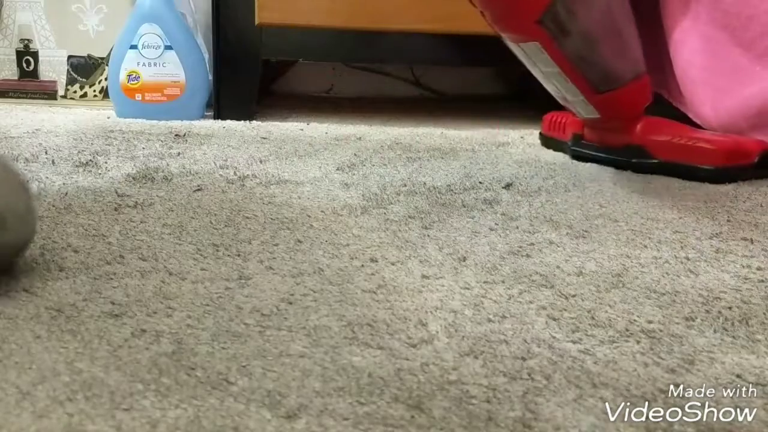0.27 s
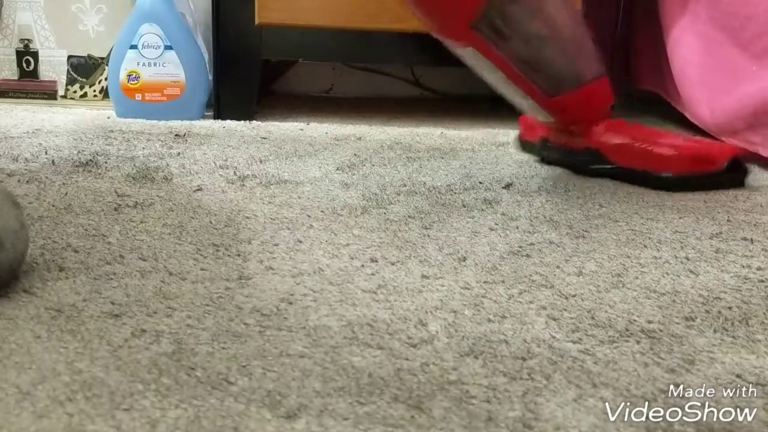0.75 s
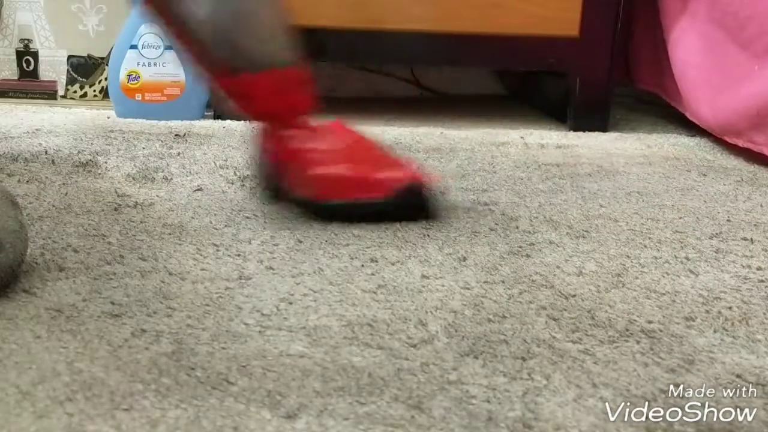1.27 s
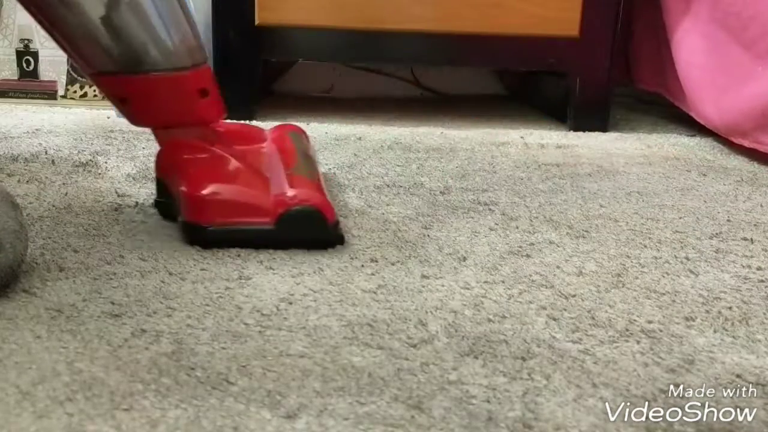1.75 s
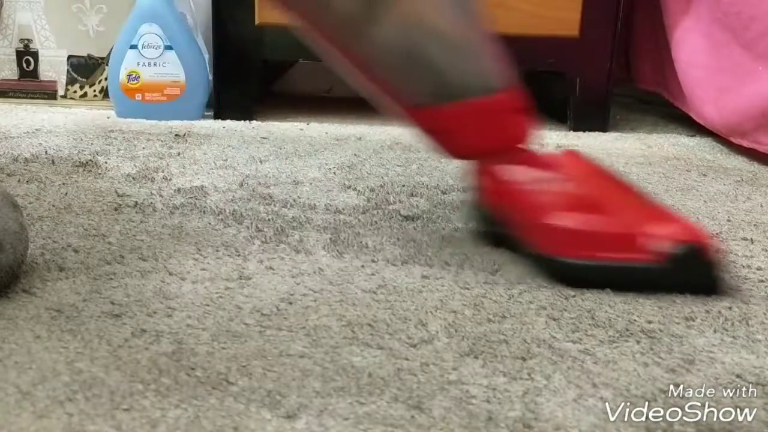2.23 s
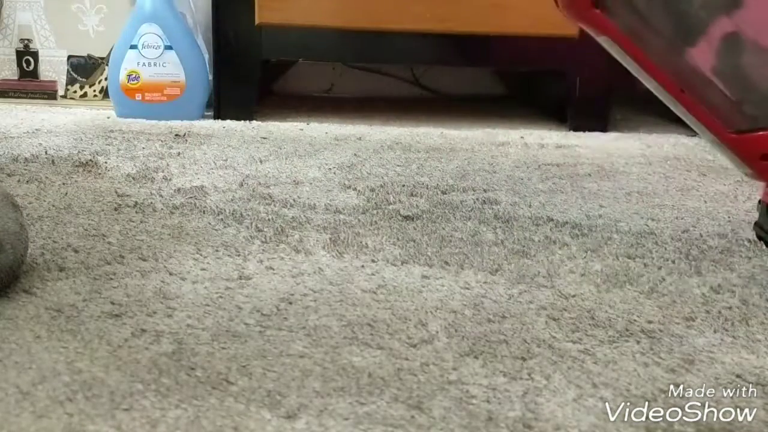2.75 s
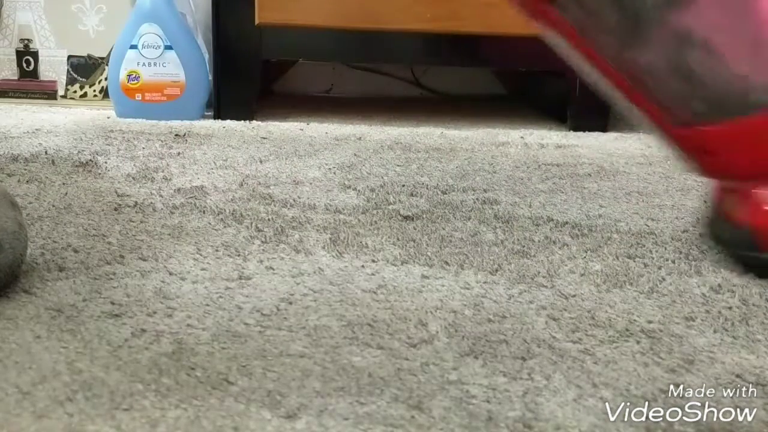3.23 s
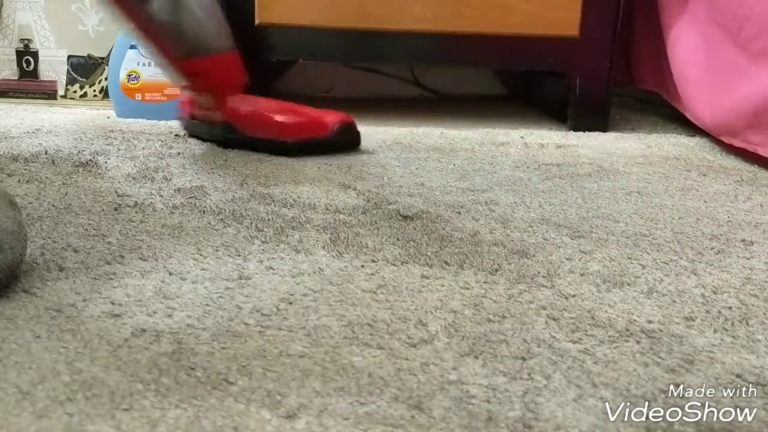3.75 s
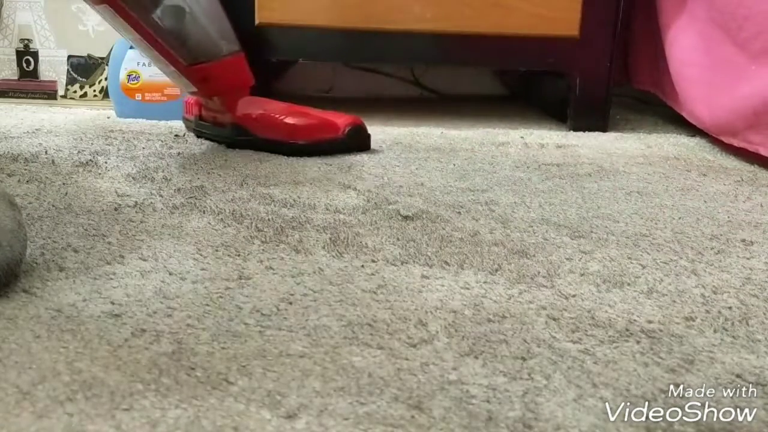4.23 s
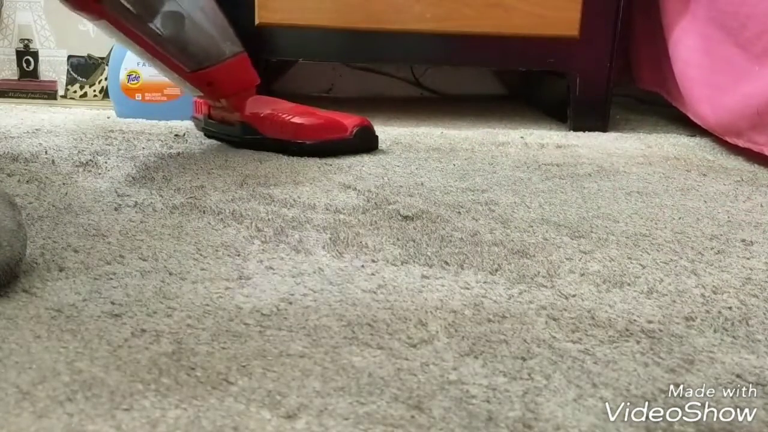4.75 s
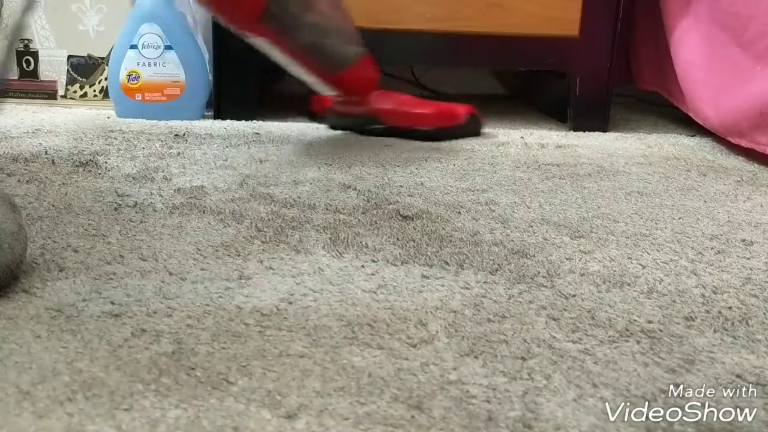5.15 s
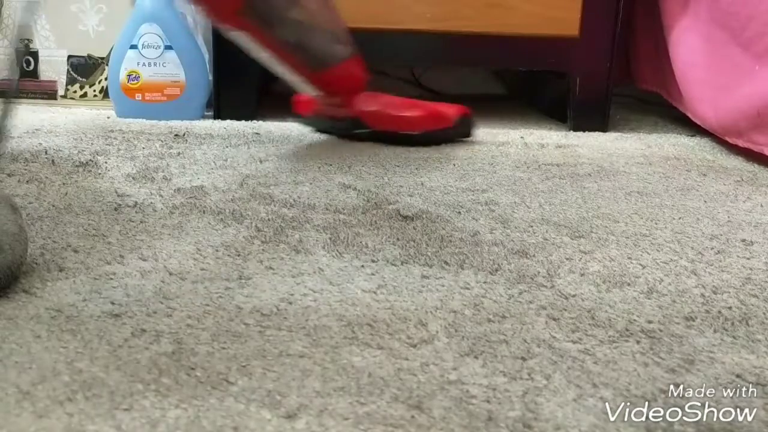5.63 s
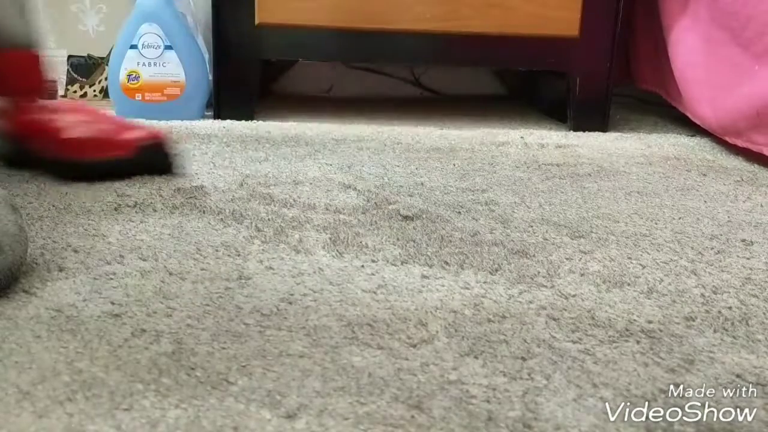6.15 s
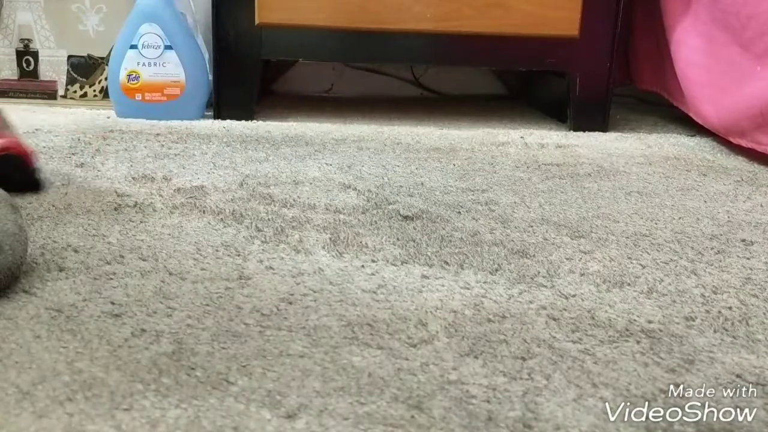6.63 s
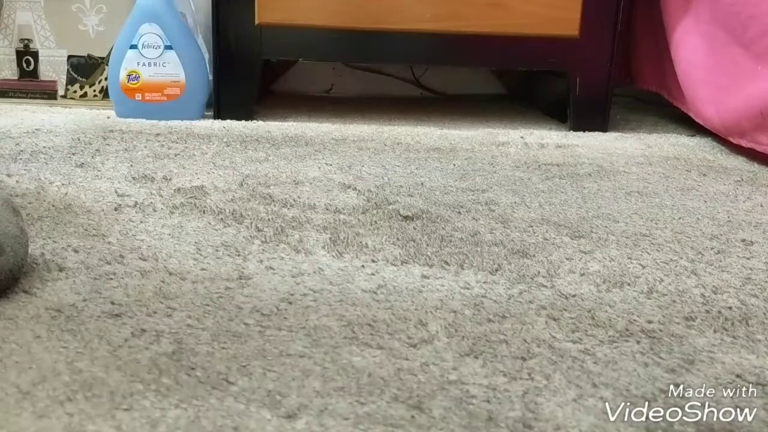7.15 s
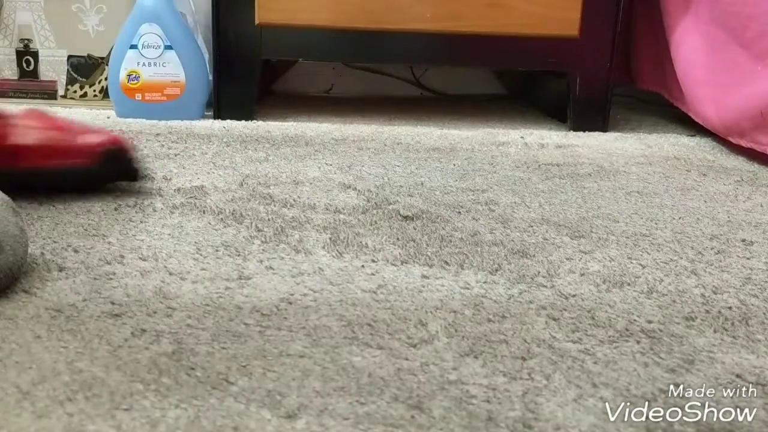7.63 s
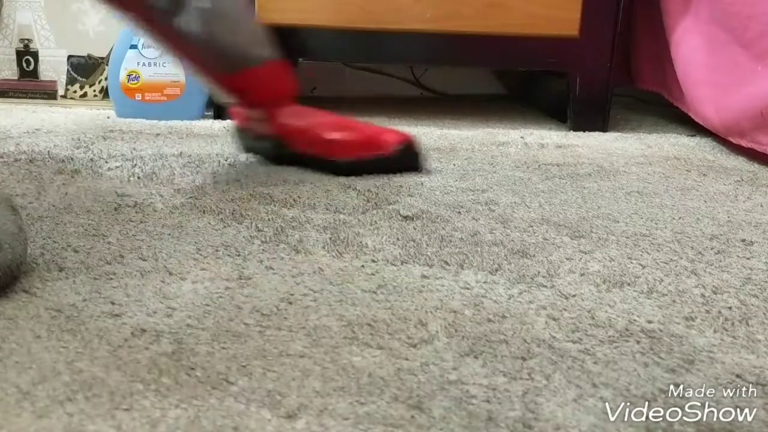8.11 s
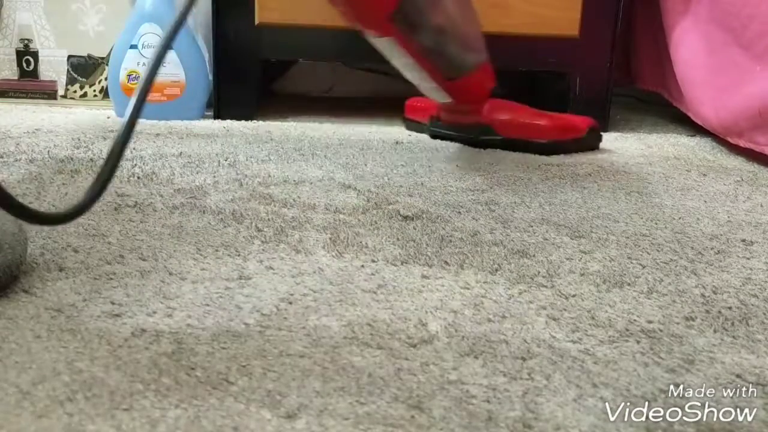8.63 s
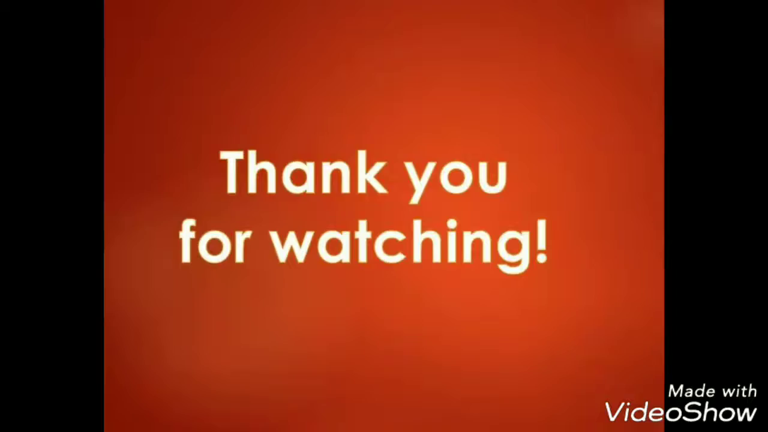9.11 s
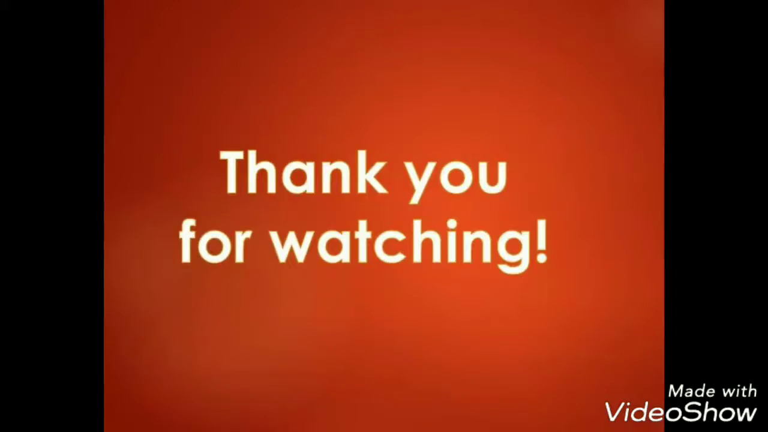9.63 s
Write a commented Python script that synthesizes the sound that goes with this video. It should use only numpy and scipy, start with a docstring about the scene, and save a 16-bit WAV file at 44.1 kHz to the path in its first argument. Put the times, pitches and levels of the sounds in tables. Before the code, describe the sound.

Continuous vacuum noise from the first instant: midrange hum, piercing but thin whistle and hissing, fizzy exhaust air at constant motor speed. The hum swells as the head passes near the floor-level microphone, and faint carpet rumble comes with pushes and pulls. One solid plastic-and-wood thud briefly ducks the noise; a weaker, duller tap follows over a second later. The close, nearly mono indoor sound ends in abrupt silence.

```python
"""Stick vacuum on carpet

A corded stick vacuum is pushed to and fro near a small microphone on the floor, until a sudden cut to silence.
Motor: sines on multiples of the shaft speed. Air through nozzle and exhaust: shaped noise in five bands.
Rolling: low noise that swells with each stroke. Two furniture bumps: noise rattle, decaying modes, room boom."""
import sys
import numpy as np
from scipy import signal
from scipy.fft import rfft, irfft, next_fast_len
from scipy.io import wavfile
from scipy.ndimage import uniform_filter1d, map_coordinates

SR = 44100
rng = np.random.default_rng(int(sys.argv[2]) if len(sys.argv) > 2 else 0)


def output_pcm(signal):
    """Save a mono or channel-first signal as 16-bit PCM at the path in sys.argv[1].

    Samples are clipped to [-1, 1] before scaling.
    """
    pcm = np.clip(np.atleast_2d(signal).T, -1, 1) * 32767
    wavfile.write(sys.argv[1], SR, np.round(pcm).astype(np.int16))


N = 435266
T = np.arange(N) / SR
MAINS_HZ = 60


def amp(db):
    """Amplitude ratio of a level in dB."""
    return 10 ** (np.asarray(db) / 20)


def unit(x):
    """Scales x to rms 1."""
    return x / np.sqrt(np.mean(x ** 2) + 1e-20)


def along(points, hz):
    """Interpolates (Hz, value) points on a log axis."""
    f, v = np.transpose(points)
    return np.interp(np.log(hz + 1), np.log(f + 1), v)


def curves(rows):
    """One value per sample for each column after the time."""
    s, *cols = np.transpose(rows)
    return [np.interp(T, s, c) for c in cols]


def wobble(knots_per_s):
    """A smooth random curve through normally distributed knots."""
    knots = rng.standard_normal(int(N * 60 / SR))
    return map_coordinates(knots, [T * knots_per_s])


def bell(middle_s, length_s, edge):
    """Rises and falls around a moment; the larger edge, the flatter the top."""
    return np.exp(-np.abs(2 * (T - middle_s) / length_s) ** edge)


def filtered(x, response):
    """x times a response of frequency, zero phase."""
    m = next_fast_len(N + SR // 2)
    return irfft(rfft(x, m) * response(np.fft.rfftfreq(m, 1 / SR)), m)[..., :N]


# left-right correlation of the noises: f/Hz, likeness
LIKENESS = [(25, .965), (70, .96), (150, .97), (300, .97), (1200, .95), (2500, .97), (5000, .94),
            (12000, .91)]


def rush(gain, patchy_db):
    """Nearly mono turbulence noise of rms 1, with time-frequency patches of random gain."""
    z = signal.stft(rng.standard_normal((2, N)), nperseg=512)[2]
    field = uniform_filter1d(rng.standard_normal(z.shape[1:]), size=3, axis=0)
    field = uniform_filter1d(field, size=18, axis=1)
    pair = signal.istft(z * amp(patchy_db * unit(field)), nperseg=512)[1][:, :N]

    def mid_side_gain(hz):
        turn = np.arccos(np.clip(along(LIKENESS, hz), -1, 1)) / 2
        return gain(hz) * [np.cos(turn), np.sin(turn)]

    mid, side = filtered(pair, mid_side_gain)
    return unit(np.array([mid + side, mid - side]))


# exhaust turning towards and away from the microphone:
# t/s, fizz level/dB, casing whoosh re fizz/dB, hiss re fizz/dB
EXHAUST = [(0, -48.5, 5.5, 0), (.35, -49, 1.5, 0), (.72, -49, 0.5, 2.5), (1.2, -47, 2, -1),
           (1.4, -48.5, 1.5, -2.5), (1.6, -51.5, 1, 0), (1.8, -52.5, 2.5, 2.5), (2.1, -52, 4, 1),
           (2.3, -49, 2.5, 0), (2.6, -47.5, 3.5, -1), (3.1, -47, 0.5, -2.5), (3.37, -47.5, 4, -0.5),
           (3.57, -45.5, 0.5, -3.5), (3.72, -46, 1.5, -2), (4.1, -49, 1.5, 3), (4.45, -46.5, 3, 0),
           (4.72, -48.5, 2, 1), (5.0, -46.5, 2.5, -1), (5.25, -47, -3.5, 2), (5.5, -48.5, -3, 0.5),
           (5.7, -48.5, -1.5, 2), (5.85, -47.5, -2, -0.5), (6.05, -50.5, 2.5, 1.5), (6.3, -49.5, 1, -1),
           (6.56, -54, 4.5, 1.5), (6.82, -55, 5, 3.5), (7.3, -54, 4.5, 0.5), (7.72, -52.5, 3.5, -1),
           (7.97, -51, -0.5, 1.5), (8.1, -48.5, 2.5, 0), (8.5, -45, -0.5, -0.5), (8.96, -43.5, -3.5, -1)]
USUAL_FIZZ_DB = -49.5
JET_DB, JET_DB_PER_SWING_DB = -53, .8
JET_DB_PER_CASING_DB, JET_DB_PER_HISS_DB = 0.52, -0.22


def air_levels():
    """Fizz, casing whoosh, hiss and jet levels in dB all follow the turning exhaust."""
    fizz_db, casing_re_db, hiss_re_db = curves(EXHAUST)
    swing_db = fizz_db - USUAL_FIZZ_DB
    jet_db = JET_DB + JET_DB_PER_SWING_DB * swing_db
    jet_db = jet_db + JET_DB_PER_CASING_DB * casing_re_db + JET_DB_PER_HISS_DB * hiss_re_db
    return fizz_db, fizz_db + casing_re_db, fizz_db + hiss_re_db, jet_db


# shaft speed: t/s, f/Hz
SHAFT_SPEED = [(0.0, 315.64), (1.4, 315.57), (2.05, 316.08), (2.35, 315.84), (2.6, 315.85), (3.25, 316.31),
               (3.65, 315.58), (4.45, 317.1), (4.7, 317.32), (5.25, 316.86), (5.9, 316.93), (6.6, 316.55),
               (6.9, 316.66), (7.5, 317.35), (8.2, 316.3), (8.85, 316.35)]
# shaft hum, loudest when the machine is near: t/s, level/dB
SHAFT_HUM = [(0.0, -46), (0.06, -56.5), (0.14, -46), (0.26, -55.5), (0.34, -46), (0.5, -51), (0.58, -43),
             (0.66, -53), (0.72, -45), (1.06, -45.5), (1.74, -35.5), (1.9, -38), (2.06, -33.5),
             (2.24, -37.5), (3.14, -44), (3.26, -39), (3.4, -39), (3.74, -44), (3.9, -42.5), (4.08, -49),
             (4.2, -47.5), (4.3, -52), (4.94, -48), (5.06, -42.5), (5.2, -52), (5.355, -43.5), (5.38, -39),
             (5.52, -40.5), (5.84, -47.5), (6.14, -45.5), (6.44, -37), (7.28, -39), (7.38, -36.5),
             (7.66, -36), (7.82, -42), (8.02, -39.5), (8.2, -46.5), (8.4, -46.5), (8.62, -42.5),
             (8.72, -45.5), (8.88, -55), (8.92, -46)]
# low overtones, swelling and fading as the machine moves through the room: t/s, level/dB
ORDER_2 = [(0.0, -53), (0.12, -58), (0.32, -47), (1.06, -56.5), (1.22, -62), (1.76, -54.5), (1.92, -66),
           (2.1, -47.5), (2.3, -59), (2.48, -45), (2.68, -50), (3.1, -52.5), (3.28, -48.5), (3.52, -56.5),
           (3.82, -48.5), (3.94, -54), (4.3, -50.5), (4.56, -56.5), (4.77, -56), (4.83, -43), (4.95, -39.5),
           (5.06, -45), (5.085, -65), (5.14, -57), (5.26, -50.5), (5.72, -52.5), (5.92, -46.5),
           (6.1, -61.0), (6.44, -49), (6.92, -47.5), (7.2, -62.5), (7.66, -48.5), (7.8, -57.5),
           (7.96, -43.5), (8.22, -65), (8.34, -52), (8.46, -57), (8.66, -46.5), (8.92, -48)]
ORDER_3 = [(0.0, -51.5), (0.14, -59), (0.38, -65), (0.64, -54.5), (0.82, -64.5), (1.14, -56.5),
           (1.32, -71.5), (1.56, -53.5), (2.02, -63.5), (2.98, -52.5), (3.6, -51.5), (3.9, -72.5),
           (4.14, -72), (4.26, -60.5), (4.42, -69), (4.88, -67), (5.48, -48), (5.72, -67), (5.88, -57),
           (6.36, -59.5), (6.78, -65.5), (7.26, -54), (7.96, -56.5), (8.22, -64), (8.4, -57.5), (8.92, -54)]
ORDER_4 = [(0.0, -60.5), (0.2, -55.5), (0.3, -62), (1.96, -55.5), (2.84, -65.5), (3.2, -63), (3.48, -67),
           (3.86, -58), (3.96, -58.5), (4.04, -71.5), (4.18, -67.5), (4.5, -57.5), (4.94, -55), (5.2, -60),
           (5.82, -54), (5.96, -58), (6.08, -79), (6.32, -61), (7.0, -72), (7.8, -55.5), (8.2, -71.5),
           (8.92, -59.5)]
ORDER_5 = [(0.0, -66.5), (0.16, -67), (0.32, -52.5), (0.44, -76), (0.66, -61.5), (0.96, -63), (1.12, -69),
           (2.26, -51.5), (2.8, -60.5), (3.7, -58.5), (3.94, -72.5), (4.14, -67.5), (4.32, -60.5),
           (5.18, -71.5), (5.44, -60), (5.76, -65), (6.76, -59), (7.7, -61.5), (8.12, -55.5), (8.32, -70.5),
           (8.5, -61), (8.92, -61.5)]
# fan blade whistle, order 10: t/s, level/dB
BLADE_WHISTLE = [(0.0, -43.0), (0.1, -45), (0.36, -41), (0.72, -45.5), (0.96, -40), (1.26, -43.5),
                 (1.52, -50), (1.6, -61.0), (1.74, -59), (1.88, -53.5), (2.28, -44), (2.46, -45),
                 (2.76, -40), (3.2, -47), (3.38, -40.5), (3.52, -58.5), (3.64, -45.5), (3.86, -46),
                 (3.94, -44), (4.1, -41), (4.52, -43), (4.64, -44), (4.92, -44.5), (5.14, -48.5),
                 (5.52, -41.5), (5.9, -47), (6.02, -61), (6.12, -45), (6.22, -45), (6.48, -60), (6.6, -57),
                 (6.68, -55), (6.98, -45.5), (7.2, -50), (7.3, -47), (7.44, -53.5), (7.68, -46.5),
                 (7.92, -58.5), (8.24, -43.0), (8.36, -42.5), (8.48, -57.5), (8.62, -43.5), (8.72, -49.5),
                 (8.8, -44.5), (8.92, -45.5)]
# orders beside the whistle, fading in and out likewise: t/s, level/dB
ORDER_8 = [(0.0, -63.5), (0.62, -73), (1.44, -48.5), (1.68, -62), (1.88, -56), (2.2, -68.5), (2.6, -51.5),
           (2.92, -59), (3.16, -46.5), (3.64, -67), (3.82, -48), (4.2, -69.5), (4.72, -51), (4.9, -64),
           (5.16, -59), (5.58, -69), (5.9, -72.5), (6.06, -53), (6.54, -64.5), (6.76, -52), (6.9, -69),
           (7.1, -56.5), (7.84, -67.5), (8.14, -51.5), (8.64, -59.5), (8.92, -56)]
ORDER_9 = [(0.0, -52.5), (0.38, -51.5), (0.8, -60), (1.04, -54), (1.48, -68), (1.98, -54.5), (2.5, -59),
           (3.18, -46.5), (3.42, -60.5), (3.58, -48.5), (3.7, -55), (3.96, -65), (4.34, -49.5), (4.94, -55),
           (5.2, -49.5), (5.46, -63.5), (5.62, -56.5), (6.14, -54.5), (6.82, -61.5), (7.24, -61.5),
           (7.7, -53), (8.02, -54.5), (8.3, -61.5), (8.54, -49), (8.74, -59.5), (8.92, -48)]
ORDER_11 = [(0.0, -57.5), (0.32, -72), (0.62, -57.5), (1.0, -62.5), (1.18, -50), (1.34, -65), (1.52, -62),
            (1.76, -56.5), (2.98, -55), (3.18, -60), (3.4, -61), (3.78, -69.5), (4.18, -51.5), (4.5, -58),
            (4.74, -59.5), (5.02, -58.5), (5.5, -49.5), (5.68, -61), (6.04, -54), (6.54, -65.0),
            (6.82, -58.5), (7.9, -68.5), (8.1, -52.5), (8.42, -52), (8.58, -61.5), (8.92, -59)]
ORDER_12 = [(0.0, -68), (0.22, -59.5), (0.84, -63.5), (1.24, -64.5), (2.02, -54.5), (2.18, -64.5),
            (2.48, -52.5), (2.8, -69), (3.06, -70.5), (3.32, -65), (3.54, -66.5), (3.82, -50.5),
            (4.16, -70.5), (4.94, -60.5), (5.2, -71), (5.4, -59.5), (5.96, -65), (6.24, -70.5),
            (6.4, -60.5), (6.7, -54), (7.08, -67), (7.88, -64.5), (8.12, -49), (8.46, -63.5), (8.66, -50),
            (8.92, -64.5)]
ORDER_LEVELS = {1: SHAFT_HUM, 2: ORDER_2, 3: ORDER_3, 4: ORDER_4, 5: ORDER_5, 8: ORDER_8,
                9: ORDER_9, 10: BLADE_WHISTLE, 11: ORDER_11, 12: ORDER_12}
# weaker orders, fading by chance as the machine moves: multiple of shaft speed, level between fades/dB
WEAK_ORDERS = [(7, -62)]
FADE_DB, FADE_KNOTS_PER_S = 9.5, 5.6
WEAK_DB_PER_SWING_DB = 0.044  # per multiple
# faint orders that leave with the exhaust air: multiple of shaft speed, level re hiss/dB
FAINT_ORDERS = [(6, -17), (13, -13), (14, -16), (15, -17), (16, -21), (17, -19), (18, -17), (19, -17),
                (20, -18), (21, -23), (22, -22), (23, -23), (27, -22), (28, -20), (30, -29), (31, -29),
                (40, -38)]
# one order swelling out of the noise: t of middle/s, length/s, multiple of shaft speed, level/dB
ORDER_SWELLS = [(.75, 0.24, 14, -54.5), (2.186, 0.44, 5, -52), (3.05, 1, 7, -58), (4.65, 1.3, 40, -73),
                (4.72, .22, 13, -52.5), (6.4, 0.51, 7, -59), (6.85, 0.42, 5, -54.5), (8.258, 0.23, 7, -55),
                (8.649, 0.37, 13, -54)]
SWELL_EDGE = 22
# torque ripple at twice the mains, beside some orders:
# multiple of shaft speed, ripples above (+) or below (-), level re fizz between fades/dB
RIPPLE_TONES = [(10, -1, -10), (10, 1, -8), (7, 1, -16)]


def order_sizes(fizz_db, hiss_db):
    """Rms of each shaft order before flutter."""
    sizes = {order: amp(curves(rows)[0]) for order, rows in ORDER_LEVELS.items()}
    for order, db in WEAK_ORDERS:
        follow_db = WEAK_DB_PER_SWING_DB * order * (fizz_db - USUAL_FIZZ_DB)
        sizes[order] = amp(db + follow_db - FADE_DB * wobble(FADE_KNOTS_PER_S) ** 2)
    for order, db in FAINT_ORDERS:
        sizes[order] = amp(hiss_db + db + 3 * wobble(6))
    for middle_s, length_s, order, db in ORDER_SWELLS:
        swell = amp(db) * bell(middle_s, length_s, SWELL_EDGE)
        sizes[order] = np.maximum(sizes[order], swell)
    return sizes


def motor():
    """Sines locked to multiples of one unsteady shaft angle; torque ripple adds side tones."""
    shaft_hz = curves(SHAFT_SPEED)[0] + .25 * wobble(25) + 0.05 * wobble(4)
    angle = 2 * np.pi * np.cumsum(shaft_hz) / SR
    fizz_db, _, hiss_db, _ = air_levels()
    out = np.zeros((2, N))
    for order, size in order_sizes(fizz_db, hiss_db).items():
        steadiness = .4 if order in (1, 10) else 1
        flutter_db = steadiness * (wobble(12) + 1.5 * wobble(30))
        if order > 30:
            flutter_db = flutter_db + 2.5 * wobble(20)
        # room paths smear the phase and turn it a little between the two ports
        smear = 0.085 * wobble(9) + 0.12 * np.sqrt(order) * wobble(2.5)
        phase = order * angle + 2 * np.pi * rng.random() + smear
        skew = 0.03 * np.sqrt(order) * wobble(24)
        out += np.sqrt(2) * size * amp(flutter_db) * np.sin([phase + skew, phase - skew])
    for order, ripples, db in RIPPLE_TONES:
        phase = order * angle + ripples * 2 * np.pi * 2 * MAINS_HZ * T + wobble(6.7)
        level_db = fizz_db + db - 6.9 * wobble(2.1) ** 2 + wobble(12)
        out += np.sqrt(2) * amp(level_db) * np.sin(phase)
    return out


# roar, changing with the nozzle's place on the carpet: t/s, level/dB, upper part re level/dB
NOZZLE_ROAR = [(0, -48.5, 2.5), (.5, -47, -1.5), (1, -49, 1.5), (1.5, -48, -1), (2, -47.5, -2.5),
               (2.5, -49, 4.5), (3, -46.5, -5.5), (3.5, -49, 4), (4, -48, 0.5), (4.5, -46.5, -1.5),
               (5, -46, -2), (5.2, -49, 1), (5.5, -51, 5.5), (6, -46, -2.5), (6.5, -47, -1.5), (7, -48, -1),
               (7.5, -47, -2.5), (7.9, -45.5, -4.5), (8.15, -47, -4), (8.4, -47.5, 3), (8.96, -46.5, 2)]
ROAR_SPLIT_HZ = 920
# relative spectral density of each flow noise: f/Hz, level/dB per Hz
ROAR_SPECTRUM = [(60, -38), (100, -7), (160, 0.5), (300, 1), (450, 0), (700, 0), (1000, -5), (1600, -5.5),
                 (2100, -8.5), (3000, -47.5)]
HISS_SPECTRUM = [(3000, -13.5), (3700, -2.5), (4400, 0.5), (4900, -2.5), (5400, -6), (6000, -52)]
JET_SPECTRUM = [(4300, -46.5), (4900, -7), (5400, 0), (5950, 0.5), (6300, -6), (7000, -10.5), (8000, -44.5)]
FIZZ_SPECTRUM = [(5500, -24), (6500, -11.5), (7600, -6.5), (8750, -1.5), (9400, -11), (10500, -21),
                 (11500, -30), (13000, -36.5), (13250, -53)]
# casing resonances: f/Hz, width at half amplitude/Hz, level/dB
CASING_MODES = [(2660, 630, 1), (3322, 530, 1.5)]
DRIFT_DB, DRIFT_KNOTS_PER_S = 0.88, 3.2
RIPPLE_SHARE = .04  # of the amplitude


def casing_gain(hz):
    """Sum of the casing's resonance peaks."""
    return sum(amp(db) / (1 + ((hz - f) / width * 2) ** 4) for f, width, db in CASING_MODES)


def nozzle_roar():
    """Low turbulent roar whose part above the split rises and falls on its own."""
    roar_db, upper_db = curves(NOZZLE_ROAR)
    roar = rush(lambda hz: amp(along(ROAR_SPECTRUM, hz)), patchy_db=2.0)
    upper = filtered(roar, lambda hz: 1 - 1 / (1 + (hz / ROAR_SPLIT_HZ) ** 4))
    level = amp(roar_db + DRIFT_DB * wobble(DRIFT_KNOTS_PER_S))
    return level * (roar + (amp(upper_db) - 1) * upper)


def air():
    """Turbulent flow: roar, casing whoosh, exhaust hiss, jet and fizz, roughened by torque ripple."""
    drifting_db = [db + DRIFT_DB * wobble(DRIFT_KNOTS_PER_S) for db in air_levels()]
    fizz_db, casing_db, hiss_db, jet_db = drifting_db
    out = nozzle_roar()
    out += amp(casing_db) * rush(casing_gain, patchy_db=2.0)
    out += amp(hiss_db) * rush(lambda hz: amp(along(HISS_SPECTRUM, hz)), patchy_db=2.0)
    out += amp(jet_db) * rush(lambda hz: amp(along(JET_SPECTRUM, hz)), patchy_db=2.0)
    out += amp(fizz_db) * rush(lambda hz: amp(along(FIZZ_SPECTRUM, hz)), patchy_db=1.8)
    return out * (1 + RIPPLE_SHARE * np.sin(2 * np.pi * 2 * MAINS_HZ * T + .5 * wobble(3)))


# pushes and pulls over the carpet: t of fastest moment/s, length/s, rumble level/dB
CARPET_STROKES = [(0.151, 0.22, -63.5), (1.25, 0.72, -64.5), (2.398, 0.72, -67), (3.549, 0.4, -63),
                  (4.699, 0.2, -68.5), (5.3, 0.43, -68), (6.15, 0.63, -64), (8.209, 1.06, -63.5)]
# relative spectral density of the rumble: f/Hz, level/dB per Hz
RUMBLE_SPECTRUM = [(20, -32), (40, -8.5), (65, 2.5), (90, -8.5), (130, -7.5), (180, -49)]
RESTING_DB = -77.5  # brush alone


def rolling():
    """The floor carries a lumpy rumble that swells with each stroke."""
    strokes = sum(amp(db) * bell(s, length_s, edge=3.6) for s, length_s, db in CARPET_STROKES)
    lumps = amp(3.2 * wobble(8.2) + 2.5 * wobble(12))
    rumble = rush(lambda hz: amp(along(RUMBLE_SPECTRUM, hz)), patchy_db=-3.5)
    return (amp(RESTING_DB) + strokes) * lumps * rumble


# head meets furniture: t of contact/s, thud level/dB, rattle level/dB, lag to thud/s, floor thump re usual/dB
FURNITURE_BUMPS = [(3.881, -25, -31.5, .0105, 0), (5.348, -34, -48, 0.0105, -12)]
# furniture modes: f/Hz, level/dB, t60/s
WOOD_MODES = [(114.3, -4, 0.26), (151.6, 4, 0.08), (204.7, 0, 0.17), (290, -5, .08), (430, -12, .03)]
# floor thump under a bump: f/Hz, level/dB, t60/s
FLOOR_MODE = (86, 0, .24)
TOUCH_DB = -8  # first touch re thud
BOOM_DB, BOOM_T60_S = -15, .3  # room's low answer, re thud


def bumps():
    """Plastic rattle and a first touch, then wood and floor modes thud and the room booms briefly."""
    out, t = np.zeros((2, N)), T[:SR // 2]
    rattle_band = signal.butter(2, [400, 1900], "band", fs=SR)
    boom_band = signal.butter(3, [75, 260], "band", fs=SR, output="sos")
    no_deep_bass = signal.butter(3, 70, "high", fs=SR, output="sos")

    def add(at_s, sound):
        out[:, round(at_s * SR):][:, :len(t)] += sound

    for s, thud_db, rattle_db, lag_s, floor_db in FURNITURE_BUMPS:
        rattle = 4 * signal.lfilter(*rattle_band, rng.standard_normal(len(t)))
        rattle *= amp(-60 * t / .07) * (1 - np.exp(-t / .001))

        floor_hz, floor_usual_db, floor_t60_s = FLOOR_MODE
        modes = list(WOOD_MODES) + [(floor_hz, floor_usual_db + floor_db, floor_t60_s)]
        ring = sum(amp(db - 60 * t / t60_s) * np.sin(2 * np.pi * hz * t) for hz, db, t60_s in modes)
        soft_start = 1 - np.exp(-(t / 0.0016) ** 2)
        thud = signal.sosfilt(no_deep_bass, ring * soft_start)

        same, apart = unit(signal.sosfilt(boom_band, rng.standard_normal((2, len(t)))))
        boom = same + 0.063 * np.array([apart, -apart])
        boom *= amp(BOOM_DB - 60 * t / BOOM_T60_S) * (1 - np.exp(-(t / .02) ** 2))

        add(s, amp(rattle_db) * rattle)
        add(s + lag_s / 3, amp(thud_db + TOUCH_DB) * thud)
        add(s + lag_s, amp(thud_db) * (thud + boom))
    return out


def scene():
    """Sum of all sources."""
    return motor() + air() + rolling() + bumps()


THRESHOLD_DB, RECOVERY_S, PULL_DB_PER_DB = -31.5, .07, 9


def gain_control(x):
    """Sound above a threshold pulls the gain down, which then recovers."""
    power = np.abs(uniform_filter1d(np.mean(x ** 2, axis=0), size=440))
    level_db = 10 * np.log10(power + 1e-12)
    excess_db = np.maximum(level_db - THRESHOLD_DB, 0)
    recent_db = uniform_filter1d(excess_db, size=880, origin=439)  # mean of the last 20 ms
    keep = np.exp(-1 / (RECOVERY_S * SR))
    smooth_db = signal.lfilter([1 - keep], [1, -keep], recent_db)
    return x * amp(-PULL_DB_PER_DB * smooth_db)


CUT_S, FADE_S, TOP_HZ = 8.982, .02, 13700


def record(dry):
    """The small microphone thins the deep bass; gain control, a short fade to the cut, a treble limit."""
    bass_cut = signal.butter(2, 60, "high", fs=SR)
    picked_up = signal.lfilter(*bass_cut, dry)
    fade = np.sin(np.pi / 2 * np.clip((CUT_S - T) / FADE_S, 0, 1)) ** 2
    return filtered(gain_control(picked_up) * fade, lambda hz: hz < TOP_HZ)


dry = scene()
out = record(dry)
output_pcm(out)
```